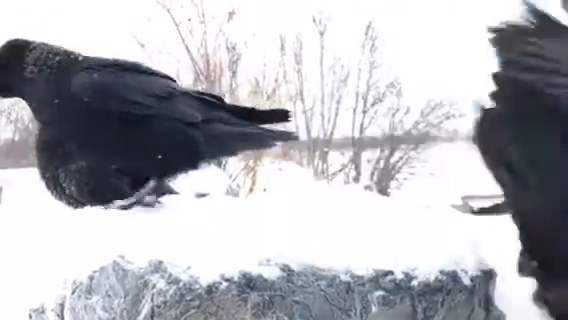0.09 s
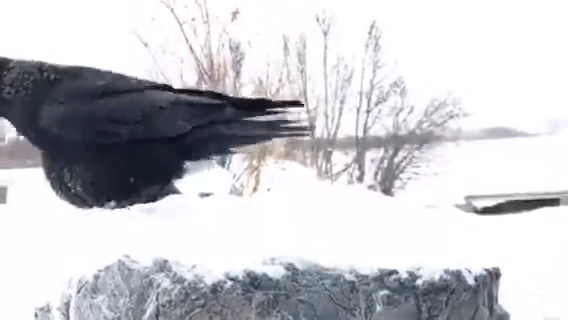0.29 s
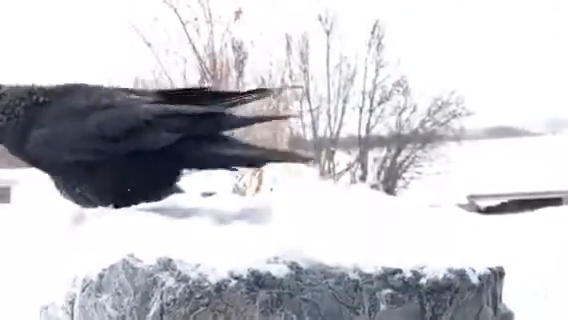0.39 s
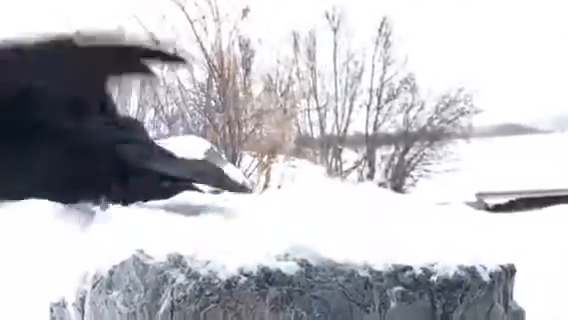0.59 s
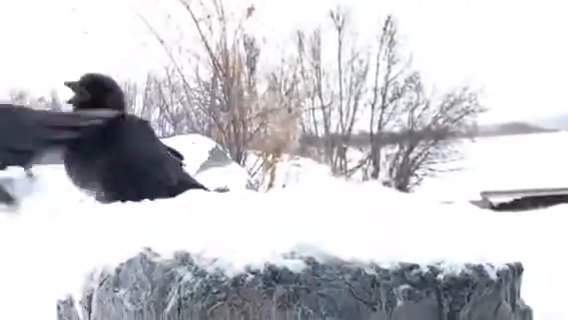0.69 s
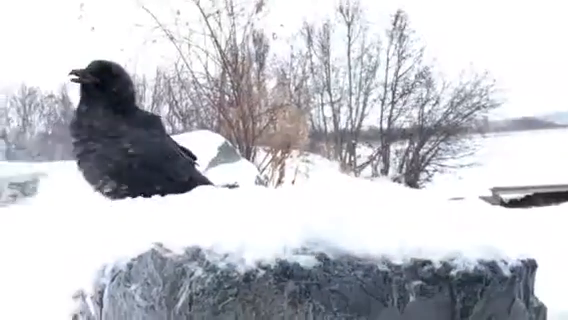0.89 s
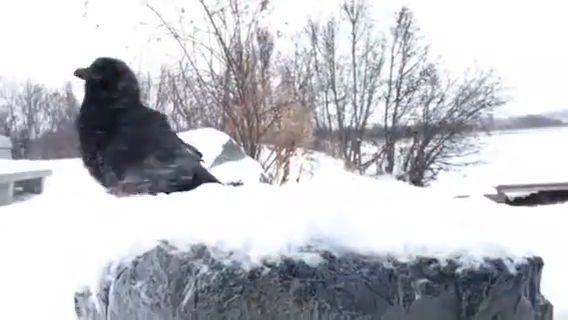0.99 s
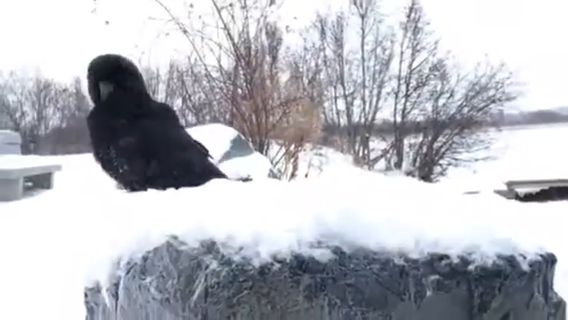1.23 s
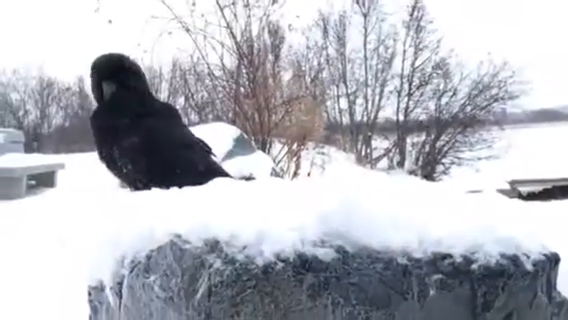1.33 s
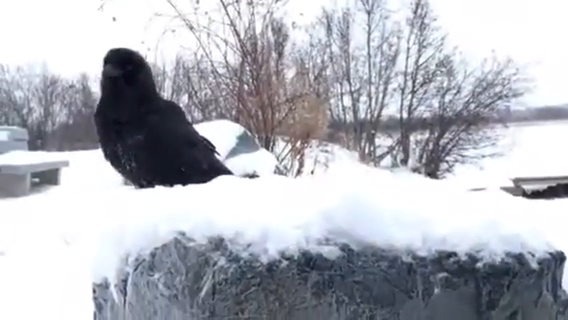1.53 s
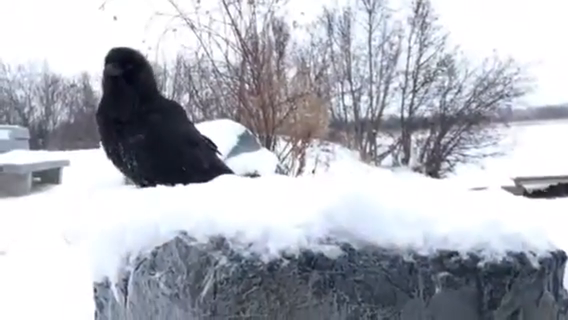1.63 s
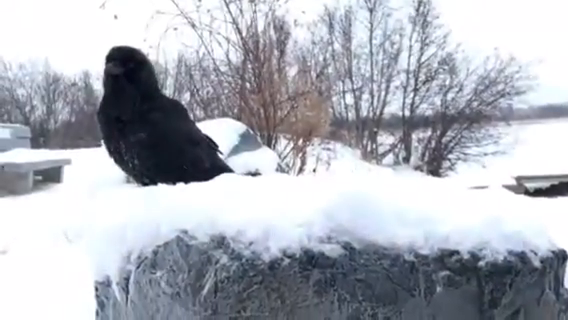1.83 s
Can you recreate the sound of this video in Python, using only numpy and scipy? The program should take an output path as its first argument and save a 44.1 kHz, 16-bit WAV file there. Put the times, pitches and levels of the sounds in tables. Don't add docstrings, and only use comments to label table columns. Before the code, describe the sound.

A raven gives one loud hoarse croak, then a second, softer, clearer call with feather rustle

```python
import sys
import numpy as np
from scipy import signal
from scipy.fft import rfft, irfft, next_fast_len
from scipy.io import wavfile
from scipy.ndimage import uniform_filter1d, map_coordinates

SR = 44100
rng = np.random.default_rng(int(sys.argv[2]) if len(sys.argv) > 2 else 0)


def rack_gain(trim_db):
    fader = np.asarray(trim_db, float)
    return 10 ** (fader / 20)


def digitize_waveform(pressure):
    field = np.atleast_2d(pressure).T
    bounded = np.clip(field, -1, 1)
    quanta = np.round(bounded * 32767).astype(np.int16)
    wavfile.write(sys.argv[1], SR, quanta)


N = 83790
TIME = np.arange(N) / SR
TOP_HZ = 15850
RING_RAD = .7


def unit(x):
    return x / np.sqrt(np.mean(x ** 2) + 1e-20)


def along(points, hz):
    f, level_db = np.transpose(points)
    return np.interp(np.log(np.abs(hz) + 1), np.log(f + 1), level_db)


def curves(rows):
    s, *columns = np.transpose(rows)
    gate = np.clip(np.minimum(TIME - s[0], s[-1] - TIME) / .0015, 0, 1)
    smooth = [uniform_filter1d(np.interp(TIME, s, column), size=200) for column in columns]
    return smooth + [gate]


def wobble(rate):
    return map_coordinates(rng.standard_normal(N // 8), [TIME * rate])


def wobbles(rate, k):
    return np.array([wobble(rate) for _ in k])


def noise(spectrum):
    m = next_fast_len(N)
    gains = rack_gain(along(spectrum, np.fft.rfftfreq(m, 1 / SR)))
    return unit(irfft(rfft(rng.standard_normal(m)) * gains, m)[:N])


def bumps(times, width_s):
    return np.exp(-.5 * ((TIME - np.c_[times]) / np.c_[width_s]) ** 2)


def stack(pitch, phase, throat, bright_db, knee_hz, swing, lag_rad=0, ring_rad=RING_RAD):
    k = np.c_[1:16]
    brightness = bright_db * np.log2(np.maximum(k * pitch / knee_hz, 1))
    gains = rack_gain(along(throat, k * pitch) + brightness)
    gains = gains / np.sqrt(np.sum(gains ** 2, axis=0) / 2) * (k * pitch < TOP_HZ)
    drift_rad = .09 * wobbles(60, k)
    lag = np.maximum(k - 2, 0) * (ring_rad + drift_rad) + lag_rad * (k > 2)
    return np.sum(gains * swing(k) * np.cos(k * phase - lag), axis=0)


# f/Hz, density/dB per Hz
TOWN = [(15, -43.5), (25, -10.5), (145, -6), (439, -39.5), (863, -24), (2410, -27), (2840, -35.5),
        (3340, -32), (16000, -42.5)]


def town():
    whine_hz, wide_hz = 887, 50
    whine = noise([(whine_hz - 2 * wide_hz, -40), (whine_hz, 0), (whine_hz + 2 * wide_hz, -40)])
    hum = rack_gain(-52.5 + 2.0 * wobble(5.3)) * noise(TOWN) + rack_gain(-67) * whine

    def ducked(onset_s):
        recovery_s = 0.61
        return (TIME > onset_s) * np.exp(-(np.maximum(TIME - onset_s, 0) / recovery_s) ** 2)

    croak_onset_s, call_onset_s = CROAK[1][0], CALL[2][0]
    return hum * rack_gain(-11 * ducked(croak_onset_s) - 1.5 * ducked(call_onset_s))


# t/s, length/s, hiss level/dB, wing push level/dB
SWISHES = [(.005, 0.0039, -49, -42.5), (0.18, 0.15, -55, -63.5), (0.469, 0.039, -53, -71),
           (0.655, 0.46, -62, -65), (0.801, 0.051, -48.5, -65), (0.83, 0.056, -56.5, -56),
           (0.881, 0.0815, -57.5, -46), (0.948, .08, -47.5, -44.5), (1.021, 0.067, -47.5, -49),
           (1.1, 0.064, -46, -39), (1.157, 0.03, -51, -46), (1.262, 0.16, -49, -48),
           (1.801, 0.044, -55.5, -77)]
# f/Hz, density/dB per Hz
FEATHER = [(150, -36), (250, -4.5), (816, -6.5), (1760, -5), (2400, -7), (2810, -17), (3170, -9),
           (8400, -9), (16000, -16)]
# f/Hz, density/dB per Hz
PUSH = [(15, -38), (25, -9), (113, 6.5), (270, -11), (314, -34.5), (400, -13), (520, -51.5), (880, -120)]
# t/s, peak level/dB, length/ms, thin share/0-1
TICKS = [(0.079, -45, 4.4, 0.9), (.2255, -20.5, 8.3, 1), (0.423, -43, 9.35, 1), (0.549, -44, 3.85, 1),
         (0.767, -38, 4.7, 0.9), (0.782, -35.5, 6.6, 1), (0.805, -41.5, 1.73, 0.1), (0.94, -30, 5.6, 0.3),
         (0.991, -30, 1.6, 0.2), (1.095, -28.5, 9.6, 0.6), (1.139, -40, 1.27, 0.2), (1.157, -38, 5.3, 0),
         (1.27, -28.5, 4.3, 0.7)]
# f/Hz, level/dB
DULL = [(500, -5.5), (1800, 9), (6000, -27.5)]
# f/Hz, level/dB
THIN = [(4000, -8), (9000, -8.5), (15500, -20.5)]


def feathers():
    s, length_s, hiss_db, push_db = np.transpose(SWISHES)
    shape = bumps(s, length_s / 2.56)
    grain_db = 1.5 * wobble(60) + 2.5 * wobble(700)
    hiss = unit(noise(FEATHER) * rack_gain(grain_db)) * (rack_gain(hiss_db) @ shape)
    push = noise(PUSH) * (rack_gain(push_db) @ shape)

    s, tick_db, ms, thin = np.transpose(TICKS)
    since = TIME - np.c_[s]
    decay = (since >= 0) * np.exp(-np.abs(since) / np.c_[ms / 2000])
    ticks = np.c_[rack_gain(tick_db - 3)] * decay
    return hiss + push + (1 - thin) @ ticks * noise(DULL) + thin @ ticks * noise(THIN)


def yard(x):
    echo_db, t60_s, delay_s = -32, .15, .008
    t = np.arange(SR // 2) / SR
    tail = rng.standard_normal(len(t)) * rack_gain(-60 * t / t60_s) * (t > delay_s)
    return rack_gain(echo_db) * signal.fftconvolve(x, tail / np.linalg.norm(tail))[:N]


# t/s, pitch f/Hz, level/dB, brightness/dB per octave
CALL = [
    (1.206, 770, -40, 0.5),
    (1.22, 810, -21.5, 3),
    (1.245, 893.3, -17.5, 4.5),
    (1.295, 921.3, -19, 3.5),
    (1.33, 946.8, -19.5, -4.5),
    (1.41, 931.6, -20, 4),
    (1.49, 915.3, -22, 5.5),
    (1.508, 849, -28, 6),
    (1.537, 554, -38.5, -7),
]
# f/Hz, level/dB
CALL_THROAT = [(600, -10), (900, 11), (1200, 12.5), (1850, -0.5), (2800, -10), (3700, -19), (5500, -26),
               (7000, -36.5), (8500, -47.5), (11500, -75), (13300, -60)]
# t/s, pitch f/Hz, level/dB
SECOND = [
    (1.285, 1180, -53),
    (1.303, 1164, -23.5),
    (1.323, 1199, -25),
    (1.363, 1188, -23.5),
    (1.413, 1162, -28.5),
    (1.435, 1180, -60),
]
# multiple of first f, multiple of second f, level re second side/dB
MIXES = [(0, 1, -2), (0, 2, -6.5), (1, 1, -14), (-1, 2, -15), (2, -1, -33), (1, 2, -18), (2, 1, -30.5),
         (2, 2, -20.5), (3, -1, -29.5), (0, 3, -36), (3, 1, -23.5), (1, 3, -41), (3, 2, -42), (2, 3, -25),
         (4, 2, -30), (4, 1, -46), (3, 3, -42)]
# f/Hz, level/dB
MIX_RASP = [(700, -36), (1350, -10.5), (1700, -24.5), (2400, 0), (3000, -10), (4200, -3.5), (6500, 0),
            (8000, -24.5)]
# t/s, centre f/Hz, level/dB
HOLLOW = [
    (1.22, 3320, 9),
    (1.24, 3400, -24),
    (1.28, 4360, -7),
    (1.34, 5630, -1),
    (1.4, 6100, 10),
]
# t/s, share of the depth
FLUTTER_FADES = [
    (1.2, 2.6),
    (1.3, 1.43),
    (1.42, 1),
    (1.54, 1.5),
]
# f/Hz, level/dB
RASP = [(430, -56), (650, -17), (1200, 0.5), (2400, -5.5), (2900, 7), (4500, 4), (6800, -5.5), (7800, -20),
        (8800, -12), (15500, -28.5)]


def call():
    pitch, level_db, bright_db, gate = curves(CALL)
    other, other_db, other_gate = curves(SECOND)
    dip_hz, dip_db, dip_gate = curves(HOLLOW)
    fading = curves(FLUTTER_FADES)[0]
    flutter_hz, jitter = 79.05, 0.0041
    beat = 2 * np.pi * np.cumsum(flutter_hz * (1 + 0.0706 * wobble(25.5))) / SR

    def flutter(k):
        depth = np.clip(fading * (0.075 + .09 * (k - 1)), 0, .95)
        return 1 + depth * np.cos(beat - 0.23 * k ** 1.79)

    def uneven(k):
        shimmer_db = .8 * np.clip(k - 2, 0, 3) * wobbles(44.1, k)
        hollow_db = dip_gate * dip_db * np.exp(-((k * pitch - dip_hz) / 450) ** 2)
        return flutter(k) * rack_gain(shimmer_db + hollow_db)

    first = 2 * np.pi * np.cumsum(pitch * (1 + jitter * wobble(300))) / SR
    second = 2 * np.pi * np.cumsum(other * (1 + jitter * wobble(430))) / SR + 0.29 * np.cos(beat)
    tone = stack(pitch, first, CALL_THROAT, bright_db, 1060, uneven, lag_rad=.7, ring_rad=1.2)
    air = rack_gain(-31) * noise(CALL_THROAT) + rack_gain(-36 + bright_db) * noise(RASP)
    rasp = air * (1 + 0.09 * np.cos(first))

    mixes = 0
    for m, n, db in MIXES:
        line = np.cos(m * first + n * second - RING_RAD * (n - 1))
        mixes = mixes - (-1) ** m * rack_gain(db) * flutter(abs(m) + abs(n)) * line
    breathy = rack_gain(-21) * noise(MIX_RASP) * (1 + 0.76 * np.cos(second - first))
    return gate * rack_gain(level_db) * (tone + rasp) + other_gate * rack_gain(other_db) * (np.sqrt(2) * mixes + breathy)


# t/s, pitch f/Hz, level/dB, brightness/dB per octave
CROAK = [
    (.2085, 635, -8.5, 2.5),
    (.219, 694.9, -8.5, 7.5),
    (.243, 762, -12, 10),
    (.29, 785.8, -13.5, 8),
    (.345, 792, -10.5, -3),
    (.378, 770.7, -11, -11.5),
    (.402, 665.3, -15.5, 3),
    (.418, 545, -26, 5),
    (.4295, 355, -32.5, 5.5),
]
# t/s, choke depth/dB, pop level/dB, pitch sag/share, glare/dB
SLIPS = [(0.2147, 30.5, -32, 0.32, 2.5), (0.2257, 25, -18, .7, 2), (0.2475, 9, -21.5, 0.68, 1),
         (.281, 6.5, -5, 1.08, 3.5), (0.307, 6.5, -6.5, 0.91, 5.5), (0.315, 9, -27, 0.5, -4.5),
         (.33, 9, -33.5, 1, 1.5), (0.3408, 15, -8.5, 0.2, 7), (.356, 20, -15, 1, 3),
         (0.3648, 12.5, -24, 0.9, 1.5), (.384, 22.5, -44, 0.7, -1.5), (0.3962, 22, -8, 0.2, -1.5)]
# f/Hz, level/dB
CROAK_THROAT = [(600, -3.5), (1000, -14.5), (1300, 16.5), (1650, 4.5), (2400, -23.5), (3000, -10.5),
                (4000, -10.5), (5000, -25), (6800, -28.5), (7800, -52), (9000, -43), (14500, -63.5)]
# t/s, level/dB
PUFF = [
    (.09, -59.5),
    (.15, -46),
    (.205, -46),
    (.215, -52.5),
    (.43, -73.5),
    (.44, -59),
    (.56, -74.5),
]
# f/Hz, level/dB
PUFF_THROAT = [(800, -71.5), (1100, -5.5), (1350, 4.5), (1700, -3.5), (2300, -11), (3300, -5.5),
               (4500, -10), (9000, -19)]


def croak():
    pitch, level_db, bright_db, gate = curves(CROAK)
    s, depth_db, pop_db, share, glare_db = np.transpose(SLIPS)
    since = TIME - np.c_[s]
    slip_s, pop_s = .0011, .0014

    def lopsided(before_s, after_s):
        return np.exp(-(since / np.where(since < 0, before_s, after_s)) ** 2)

    sag = .14 * (np.c_[share] * np.where(since < 0, 1, .6) * lopsided(.005, .009)).max(0)
    shine_db = (np.c_[glare_db] * lopsided(.007, .004)).max(0)

    beak_opens_s, muffle_share = .2178, .35
    shut_db = -17 * np.clip((beak_opens_s - TIME) / pop_s, 0, 1)
    shine_db = shine_db + (1 - muffle_share) * shut_db
    level_db = level_db + muffle_share * shut_db

    gap = bumps(s, slip_s)
    pop_phase = 2 * np.pi * np.cumsum(1.25 * pitch) / SR
    pop = rack_gain(pop_db) @ bumps(s, pop_s) * np.cos(pop_phase)

    jitter, wander = .005 * wobble(700), .012 * wobble(88)
    pitch = pitch * (1.04 - uniform_filter1d(sag, size=40) + jitter + wander)
    skip = .12 * share @ bumps(s + slip_s, slip_s) / (slip_s * np.sqrt(2 * np.pi))
    phase = 2 * np.pi * np.cumsum(pitch + skip) / SR
    choke_db = depth_db @ gap

    def drift(k):
        shimmer_db = 1.1 * np.sqrt(k) * wobbles(90, k)
        return rack_gain(shimmer_db - choke_db * np.where(k == 2, 1, .3) + shine_db * (k > 2))

    tone = -stack(pitch, phase, CROAK_THROAT, bright_db, 1900, drift)
    rasp_db = -21 + 5 * gap.max(0) + shine_db + bright_db + 2 * wobble(170)
    rasp = noise(RASP) * (1 + 0.32 * np.cos(phase)) * rack_gain(rasp_db)
    puff_db, puff_gate = curves(PUFF)
    puff = puff_gate * rack_gain(puff_db) * noise(PUFF_THROAT)
    return gate * rack_gain(level_db) * (tone + rasp + pop) + puff


def scene():
    voices = croak() + call()
    return (voices + yard(voices) + feathers() + town())[None]


def roll_off(x):
    return signal.sosfilt(signal.butter(12, 17030, fs=SR, output="sos"), x)


def record(dry):
    ceiling = .86
    dry = dry / (1 + np.abs(dry / ceiling) ** 6) ** (1 / 6)
    m = next_fast_len(N)
    mix = irfft(rfft(dry, m) * (np.fft.rfftfreq(m, 1 / SR) < TOP_HZ), m)[:, :N]
    return roll_off(mix)


dry = scene()
out = record(dry)
digitize_waveform(out)
```